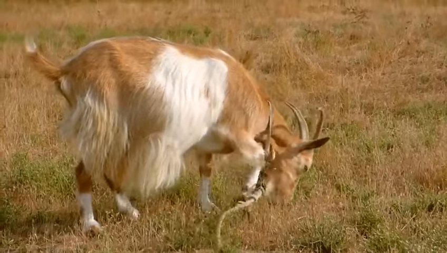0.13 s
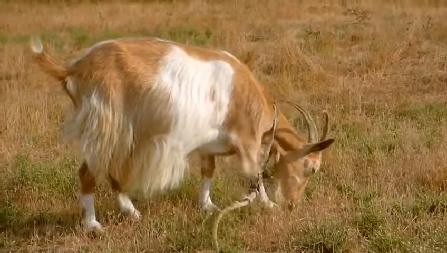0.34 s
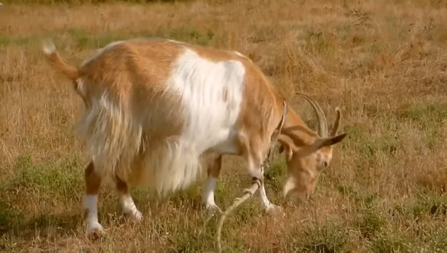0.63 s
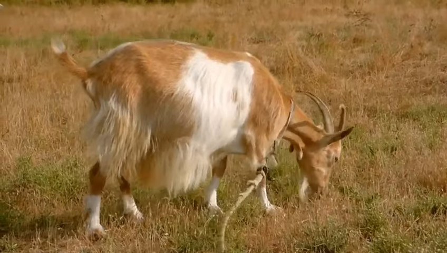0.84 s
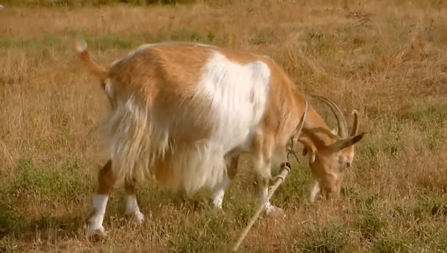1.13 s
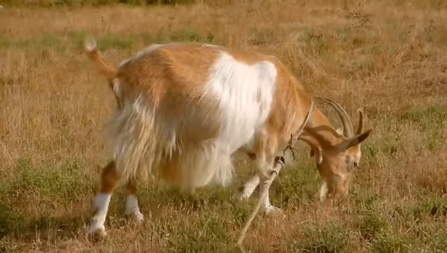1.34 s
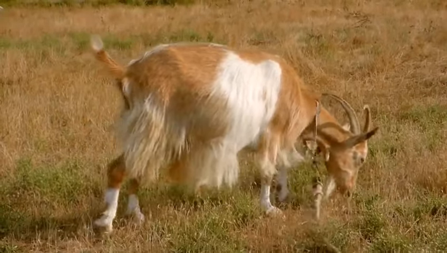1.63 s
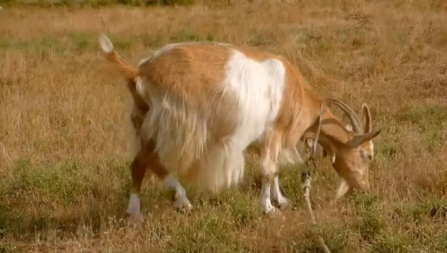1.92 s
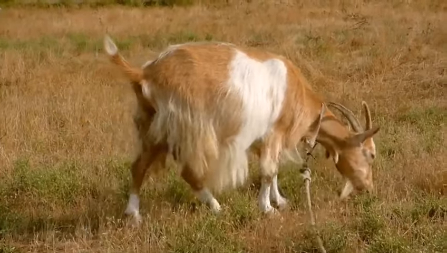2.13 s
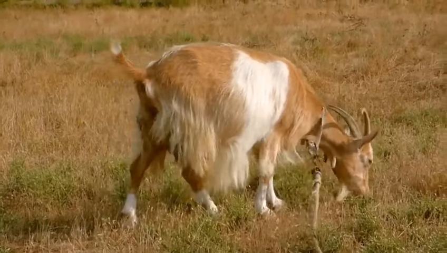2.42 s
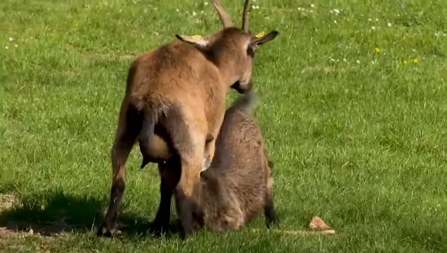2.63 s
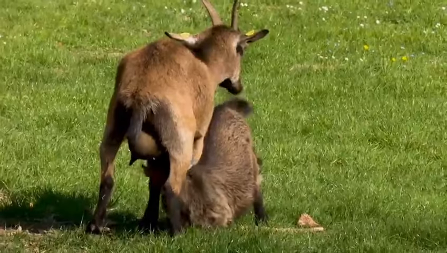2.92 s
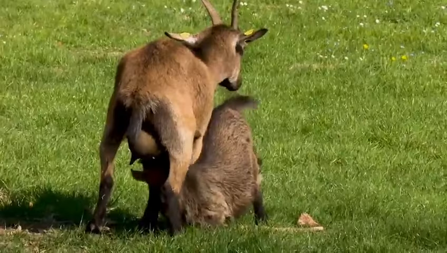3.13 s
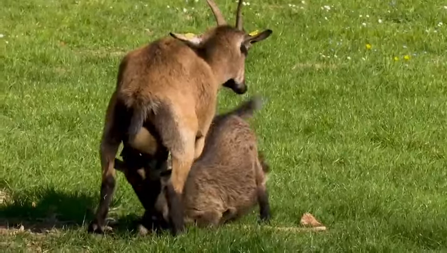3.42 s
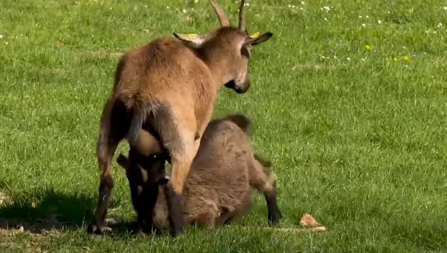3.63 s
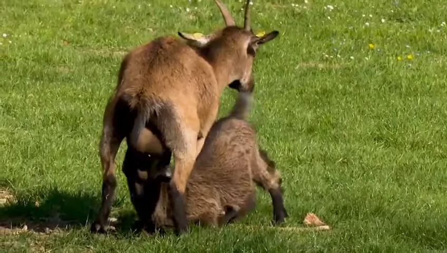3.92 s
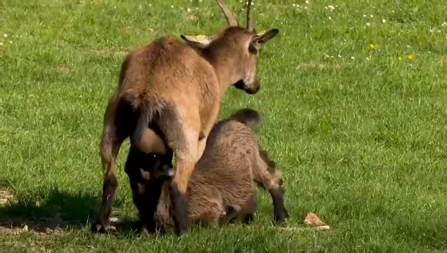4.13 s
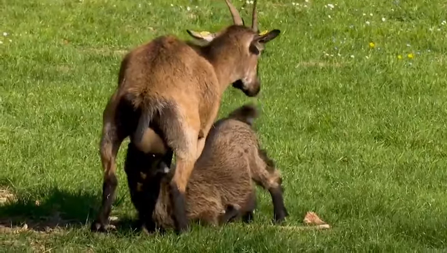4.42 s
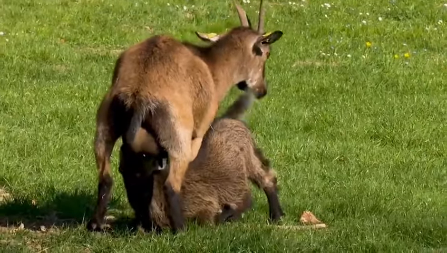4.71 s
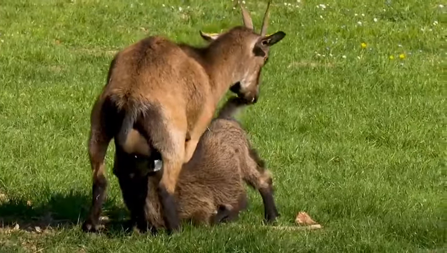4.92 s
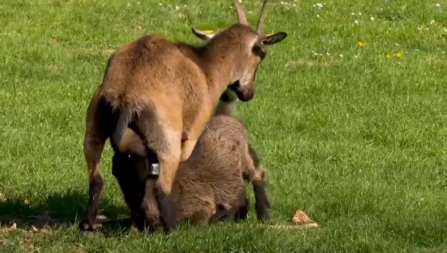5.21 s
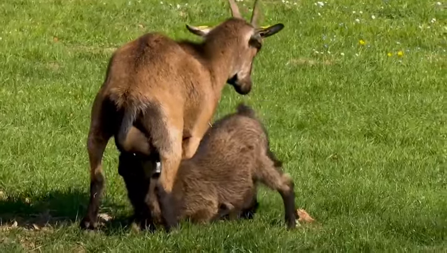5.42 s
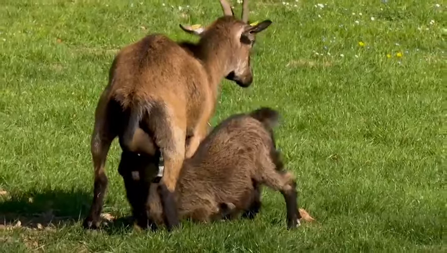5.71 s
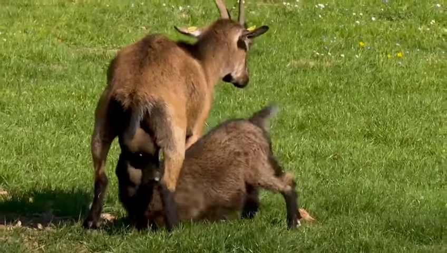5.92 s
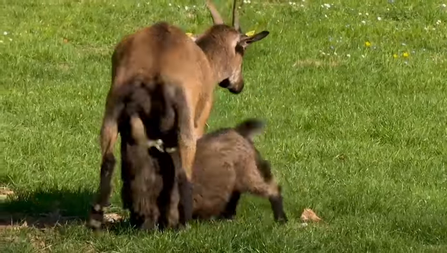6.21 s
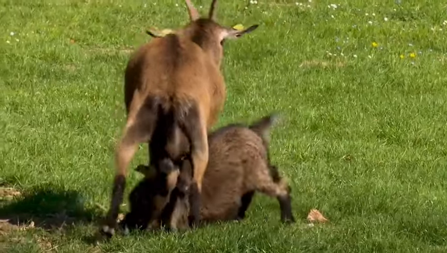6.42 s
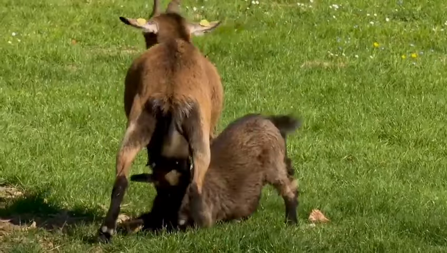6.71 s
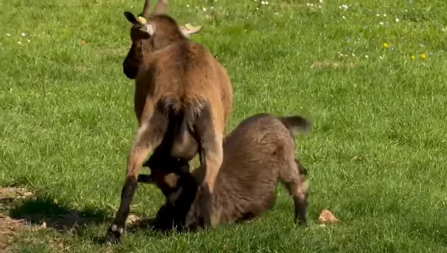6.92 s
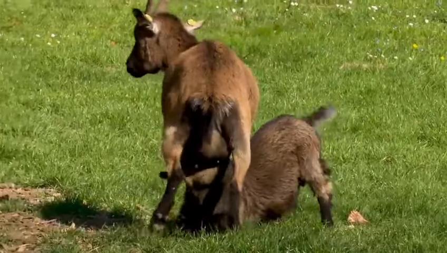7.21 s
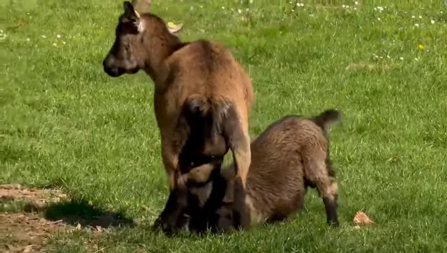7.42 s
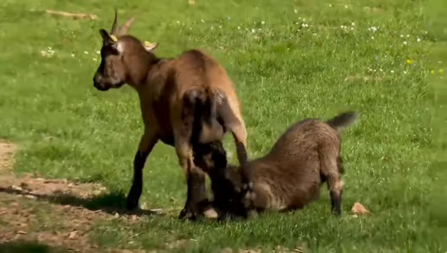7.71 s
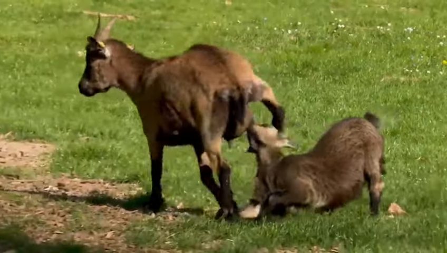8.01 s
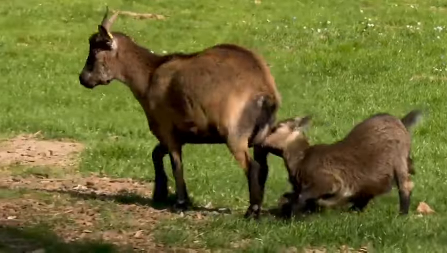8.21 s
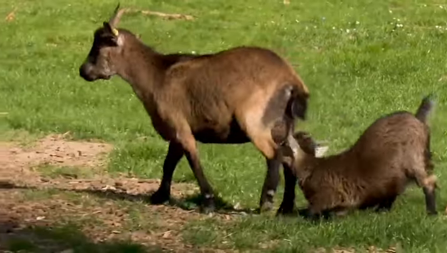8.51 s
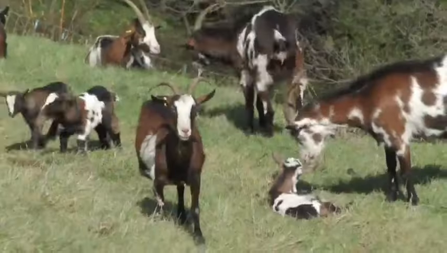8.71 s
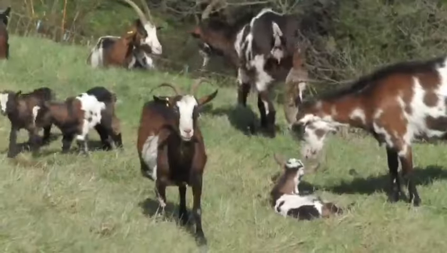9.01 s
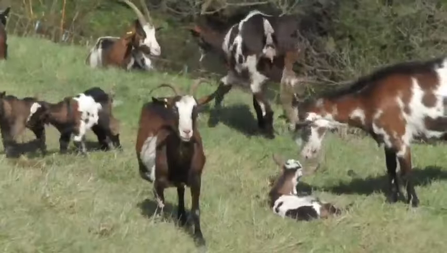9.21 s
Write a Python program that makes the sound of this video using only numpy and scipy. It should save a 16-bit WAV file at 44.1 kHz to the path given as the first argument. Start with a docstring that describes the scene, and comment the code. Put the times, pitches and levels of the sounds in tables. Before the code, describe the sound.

A fading breathy creak opens over faint hiss and low breeze. After a quiet stretch, a soft closed-mouth goat hum starts to become a call but is chopped into brief silence. A loud, quavering bleat follows, then a second after a pause, both ending in creaks. Another hum and bleat onset is cut off, and a last loud bleat runs to an abrupt end. Close, dry outdoor microphone.

```python
"""Young goat bleating on a quiet pasture

Close mono microphone. Each bleat is a sum of vocal-fold harmonics, shaped by throat resonances, throbbing about
ten times a second as the throat opens and squeezes. Full bleats end in a creak: uneven pulses mixed with breath.
A soft hum precedes the third bleat. Filtered noise makes the hiss and the low buffet of breeze.
The sound is a loop cut into pieces with short silences between: the third bleat is cut off twice as it begins."""
import sys
import numpy as np
from scipy import signal
from scipy.fft import rfft, irfft, next_fast_len
from scipy.io import wavfile
from scipy.ndimage import map_coordinates

SR = 44100
rng = np.random.default_rng(int(sys.argv[2]) if len(sys.argv) > 2 else 0)


def unload_audio(sound):
    """Save the sound as a 16-bit wav file, at the path given as the first command line argument."""
    columns = np.transpose(np.atleast_2d(sound))
    # keep every value between -1 and 1, then stretch to whole-number steps
    steps = np.round(np.clip(columns, -1, 1) * 32767)
    wavfile.write(sys.argv[1], SR, steps.astype(np.int16))


N = 412776

# Event times are loop times. Spectrum and resonance levels are relative.
# distant air and microphone hiss: hz, level_db
HISS_SPECTRUM = [(41, -27.5), (70, 1), (103, -0.5), (381, -10), (572, -10), (627, -11.5), (785, -11),
                 (899, -13.5), (1690, -17.5), (3820, -25), (11000, -17), (15500, -18)]
HISS_DB = -55
# breeze on the microphone: time_s, level_db
BUFFET_CURVE = [(2.62, -59), (3.12, -48.5), (5.35, -56.5), (5.4, -47), (5.82, -60), (5.92, -46),
                (6.03, -56), (7.97, -53), (8.12, -61), (8.15, -58), (8.53, -51), (8.6, -51.5)]
# low breeze spectrum: hz, level_db
RUMBLE_SPECTRUM = [(8.8, -46), (15, -12.5), (38, -6), (50, -6.5), (65, -29), (90, -25.5), (120, -40.5),
                   (200, -120)]

# closed-mouth hum before the third bleat, ahead of wobble: time_s, pitch_hz, level_db
GRUNT_CURVE = [(8.25, 176.2, -57), (8.285, 186.2, -53.5), (8.32, 154, -48), (8.365, 172.5, -52.5),
               (8.42, 160, -56)]
# harmonics of the hum from the fundamental up: level_db
GRUNT_HARMONICS_DB = [1, -8, -6.5, -58, -14]

# creaks and breath around bleats, fading or still growing at the end; brightness is high band against low:
# start_s, middle_s, end_s, first_db, middle_db, last_db, bright_db, bright_change_db
CREAK_EVENTS = [(3.422, 3.493, 3.53, -47, -42.5, -55, 1.5, 0),
                (3.53, 3.56, 3.63, -50, -49.5, -74, -6.5, -10),
                (5.886, 5.954, 6.095, -43, -44.5, -70, 3.5, -16),
                (8.27, 8.353, 8.424, -66, -55.5, -73, -9, 12.5),
                (8.462, 8.521, 8.518, -58.5, -39.5, -24, 3, 4),
                (8.546, 8.598, 8.623, -47, -44, -43, -5, 13.5)]
# one row a creak: mean pulse_rate_hz, breath_share (0-1)
CREAK_SOURCES = [(310, .3), (200, .4), (165, .4), (165, .5), (180, .2), (230, .3)]
# slack throat, low (response squared in use) and high: hz, width_hz, level_db
CREAK_LOW_MODES = [(630, 390, 2.5), (1545, 590, 3.5), (2830, 670, 2)]
CREAK_HIGH_MODES = [(3380, 190, 3), (4480, 1200, 0), (5170, 540, 4.5), (9700, 1600, -6)]
CREAK_UNEVEN_DB = 1.5

# throbs, one list a bleat; squeezed_db follows the throb, the three resonances are of jaw, tongue and lips:
# start_s, end_s, pitch_hz (before bends), open_db, squeezed_db, low1_hz, low2_hz, low3_hz
BLEAT_THROBS = [
    [(2.599, 2.634, 359.7, -31, -34, 870, 2047, 2700), (2.688, 2.732, 378.3, -21, -26, 1050, 1943, 2720),
     (2.779, 2.833, 372, -22.5, -26, 1080, 1954, 3200), (2.873, 2.928, 370, -22.5, -25.5, 1040, 1911, 2900),
     (2.962, 3.023, 367.7, -24, -25, 1110, 1950, 3070), (3.065, 3.114, 371, -21.5, -26.5, 1094, 1894, 2790),
     (3.155, 3.204, 364.5, -22.5, -29.5, 1070, 1940, 2780),
     (3.252, 3.304, 352.6, -23.5, -30.5, 1034, 1927, 2770),
     (3.362, 3.398, 323.5, -21.5, -39, 910, 1612, 2630)],
    [(5.036, 5.077, 285, -48.5, -62.5, 660, 1826, 2730), (5.14, 5.187, 356, -44.5, -55.5, 890, 1950, 2700),
     (5.238, 5.278, 377.6, -26.5, -30.5, 1020, 1820, 2940),
     (5.341, 5.377, 376.2, -25, -31.5, 1310, 1970, 2900),
     (5.437, 5.484, 376, -26.5, -28.5, 1280, 2130, 2986), (5.534, 5.583, 367.8, -27, -28, 1230, 2109, 3020),
     (5.635, 5.684, 358.6, -25, -28, 1240, 2140, 2920), (5.742, 5.78, 349.6, -24, -30, 1210, 2154, 2830),
     (5.84, 5.879, 305.5, -30.5, -44, 940, 2165, 2830)],
    [(8.422, 8.46, 315, -46, -47.5, 715, 1580, 2860), (8.518, 8.544, 350.7, -30.5, -34.5, 630, 1900, 2750)],
]
# four bright resonances, one list a bleat: first_throb_hz, last_throb_hz
BRIGHT_GLIDES = [
    [(3300, 3500), (4350, 4350), (4850, 4950), (5550, 5850)],
    [(3260, 3700), (4800, 4250), (4720, 4910), (5570, 5600)],
    [(3500, 3300), (4200, 4240), (4940, 5070), (5590, 5590)],
]
# open throat, three low then four bright resonances, one list a bleat: width_hz, level_db
THROAT_MODES = [
    [(117, -4), (117, 3.5), (340, -5), (120, -2), (134.6, -2.5), (184, -2.5), (132, -7.5)],
    [(490, -4.5), (208, 2.5), (124, -1.5), (451, 1.5), (530, 1.5), (120, 4), (121, -1)],
    [(125, -4.5), (191, -0.5), (120, -4.5), (120, 2.5), (120, 7.5), (120, 0), (251, -24)],
]
# small head cavities: hz, width_hz, level_db
SINUS_MODES = [(6340, 130, -29.5), (7300, 420, -24), (8910, 720, -20), (12200, 590, -50),
               (14000, 1300, -48.5)]
# side resonances of the narrowed throat: hz, width_hz, level_db
SQUEEZED_MODES = [(872, 450, -16), (1950, 117, -5), (2900, 630, -8), (4110, 1200, -2.5), (4830, 1500, -4.5)]
# ring of the squeezed throat, one row a bleat (response squared in use): first_hz, last_hz, width_hz, level_db
WHISTLE_RINGS = [(3590, 3490, 390, 0), (3480, 3640, 910, -3), (3880, 3660, 850, -1.5)]
# fundamental, one value a bleat: level_db
FUNDAMENTAL_DB = [-21, -25.5, -12.5]
# roughness, one value a bleat: relative
HOARSENESS = [.85, 1.25, 1.2]
# brightness at the reference effort, one value a bleat: level_db
BRIGHTNESS_DB = [-1.5, -3.5, -3.5]
BRIGHT_PER_DB, EFFORT_DB = 0.16, -20  # brightness follows the squeezed level around this effort
# move of each resonance as the throat shuts: share
SHUT_SHIFT_SHARE = [-.15, 0.053, .0, .03, .0, 0.015, 0.042]
PITCH_STEP_S, PITCH_RECOVER_S = .014, .014  # pitch step ahead of a throb; time constant of its climb
SQUEEZE_LIFT_SHARE = .015  # pitch rise when fully squeezed

# cuts of the loop: start_s, end_s, place_in_loop_s, fade_in_s
LOOP_PIECES = [(0, 2.499, 5.9907, 0), (2.572, 8.606, 2.572, .03), (8.721, 9.36, 2.6142, .04)]
PREAMP_PEAK, TOP_HZ = 0.36, 15550  # full scale = 1; band limit


def amp(db):
    """Gain of a level in dB."""
    return 10 ** (np.asarray(db) / 20)


def unit(x):
    """x at rms 1."""
    return x / np.sqrt(np.mean(x ** 2) + 1e-20)


def wobble(rate_hz, size):
    """Smooth random curve with rate_hz knots a second."""
    knots = rng.standard_normal(int(size * rate_hz / SR) + 4)
    return map_coordinates(knots, [np.arange(size) * rate_hz / SR])


def filtered(x, response):
    """x through a complex response of frequency."""
    m = next_fast_len(x.shape[-1] + 8192)
    return irfft(rfft(x, m) * response(np.fft.rfftfreq(m, 1 / SR)), m)[..., :x.shape[-1]]


def resonances(modes, f):
    """Causal response of parallel (hz, width_hz, level_db) modes of alternating sign."""
    return sum((-1) ** k * amp(db) * 1j * f * w / (c * c - f * f + 1j * f * w)
               for k, (c, w, db) in enumerate(modes))


def coloured(spectrum):
    """Noise of rms 1 with a (hz, level_db) spectrum."""
    hz, db = np.transpose(spectrum)

    def response(f):
        return amp(np.interp(np.log(f + 1), np.log(hz), db, -120, -120))
    return unit(filtered(rng.standard_normal(N), response))


def span(rows):
    """First sample, 4 ms end ramps and interpolated columns of a curve."""
    s, *cols = np.transpose(rows)
    t = np.arange(s[0], s[-1], 1 / SR)
    ends = np.clip(np.minimum(t - s[0], s[-1] - t) / .004, 0, 1)
    return round(s[0] * SR), ends, [np.interp(t, s, c) for c in cols]


def add(track, start, x):
    """Mix x into track from sample start."""
    track[start:start + len(x)] += x


def pasture():
    """Filtered-noise hiss, drifting slightly, over a lumpy low buffet of breeze."""
    time_s, db = np.transpose(BUFFET_CURVE)
    lumps = unit(coloured(RUMBLE_SPECTRUM) * amp(1.6 * wobble(14, N)))
    buffet = amp(np.interp(np.arange(N) / SR, time_s, db)) * lumps
    drift_db = .4 * wobble(2.3, N)
    return amp(HISS_DB + drift_db) * coloured(HISS_SPECTRUM) + buffet


def grunt(track):
    """Closed-mouth hum: a wavering harmonic tone with few overtones."""
    first, ends, (hz, db) = span(GRUNT_CURVE)
    turns = np.cumsum(hz * (1 + .03 * wobble(60, len(hz)))) / SR
    tone = sum(amp(level_db) * np.sin(2 * np.pi * (k + 1) * turns)
               for k, level_db in enumerate(GRUNT_HARMONICS_DB))
    add(track, first, ends * amp(db + 3.6 * wobble(45, len(hz))) * tone)


def creak(track, rows, pulse_rate_hz, breath_share):
    """Slow uneven pulses mixed with breath noise, through a slack throat."""
    first, ends, (db, bright_db) = span(rows)
    size = len(db)
    count = np.floor(np.cumsum(pulse_rate_hz * (1 + .15 * wobble(120, size))) / SR)
    pulses = (np.diff(count, prepend=0) > 0) * amp(2 * rng.standard_normal(size))
    breath = rng.standard_normal(size)
    air = np.sqrt(1 - breath_share) * unit(pulses) + np.sqrt(breath_share) * breath
    low = unit(filtered(air, lambda f: resonances(CREAK_LOW_MODES, f) ** 2))
    high = unit(filtered(air, lambda f: resonances(CREAK_HIGH_MODES, f) / (1 + (f / 6100) ** 10) ** 0.14))
    level = amp(db + CREAK_UNEVEN_DB * wobble(33, size))
    add(track, first, ends * level * (low + amp(bright_db) * high))


def bleat(track, rows, glides, throat, tone_db, chest_db, whistle, hoarse):
    """Vocal-fold harmonics through an open mouth in the throbs and a squeezed throat between."""
    start, end, pitch_hz, open_db, squeezed_db, *tract_hz = np.transpose(rows)
    tract_hz += [np.linspace(first, last, len(rows)) for first, last in glides]
    whistle_hz = np.linspace(*whistle[:2], len(rows))
    bright_db = tone_db + BRIGHT_PER_DB * (squeezed_db - EFFORT_DB)
    t = np.arange(start[0] - .05, end[-1] + 0.089, 1 / SR)

    def by_throb(v):
        return np.interp(t, (start + end) / 2, v)

    def knee(u):
        return np.logaddexp(0, u / 0.0029) * 0.0053

    def near(s, width_s):
        return np.exp(-((t - s[:, None]) / width_s) ** 2).sum(0)

    # slow swell, quick close; a throb after near silence bursts out
    early, late = knee(start[:, None] + 0.0046 - t), knee(t - end[:, None] + 0.0025)
    swell = 437 + 20 * (open_db - np.r_[squeezed_db[0], squeezed_db[:-1]])  # slope, scaled further by knee
    opening = amp(open_db[:, None] - swell[:, None] * early - 1360 * late).sum(0)
    gaps = np.c_[end, np.r_[start[1:], end[-1] + .025]].ravel()
    gap_db = np.r_[squeezed_db[0] - 20, np.repeat(squeezed_db, 2), squeezed_db[-1] - 15]
    squeeze = amp(np.interp(t, np.r_[start[0], gaps, t[-1]], gap_db))
    closed = squeeze / (squeeze + opening)

    # slack folds sound lower as each throb starts and ends
    since = t - (start[:, None] - PITCH_STEP_S)
    climb = np.exp(-np.maximum(since, 0) / PITCH_RECOVER_S)
    scoop = (climb * np.exp(-(np.minimum(since, 0) / .004) ** 2)).sum(0)
    sag = 0.12 * scoop + 0.043 * near(end, .008)
    sag += .05 * np.clip((t - start[-1]) / .06, 0, 1)  # breath runs out
    jitter = hoarse * (.002 + .001 * closed) * wobble(120, len(t))
    steps = np.c_[start - PITCH_STEP_S, np.r_[start[1:], t[-1]] - PITCH_STEP_S - .006].ravel()
    base_hz = np.interp(t, steps, np.repeat(pitch_hz, 2))
    f0 = base_hz * (1 - sag + SQUEEZE_LIFT_SHARE * closed + jitter)
    turns = np.cumsum(f0) / SR

    # tract gain of each harmonic, every 32 samples
    order = np.arange(1, 46)[:, None]
    grid = slice(None, None, 32)
    f = order * f0[grid]
    modes = [((by_throb(hz) * (1 + shift * closed))[grid], w, db)
             for hz, shift, (w, db) in zip(tract_hz, SHUT_SHIFT_SHARE, throat)]
    cliff = 1 / (1 + (f / 5900) ** 14) ** .5  # the mouth passes little above its last resonance
    low = resonances(modes[:3], f) * (order > 1) + amp(chest_db) * (order == 1)
    bright = amp(by_throb(bright_db)[grid])
    wide = (low + bright * resonances(modes[3:], f)) * cliff  # low and bright cancel in a notch between
    wide = wide / np.sqrt(np.sum(abs(wide[:7]) ** 2, 0) / 2)  # level set by the first seven harmonics
    sinus = resonances(SINUS_MODES, f)
    wide = wide + bright * sinus
    shut = (squeeze * closed)[grid]
    ring_mode = (np.interp(t[grid], end + 0.023, whistle_hz), *whistle[2:])
    clear = wide * opening[grid] + resonances([ring_mode], f) ** 2 * shut
    rasp = (resonances(SQUEEZED_MODES, f) * cliff + amp(-6.0) * sinus) * shut

    # turbulence smears each harmonic, most as the throat opens and shuts
    edges = near(start, 0.011) + near(end, 0.016)
    voice = np.zeros(len(t))
    for k, steady, ragged in zip(order[:, 0], clear, rasp):
        stir = wobble(260, len(t)) + 1j * wobble(260, len(t))
        blur = hoarse * (.035 + .005 * k + .0003 * k * k) * (1 + 1.3 * edges)
        gain = np.interp(t, t[grid], steady) * (1 + blur * stir)
        gain = gain + np.interp(t, t[grid], ragged) * (.45 + .65 * stir)
        voice -= np.real(gain * np.exp(2j * np.pi * k * turns))
    shimmer = amp((.5 + 1.5 * closed) * wobble(60, len(t)))  # breath pressure flutters
    add(track, round(t[0] * SR), voice * shimmer)


def goat():
    """All the calls, plus a faint decaying noise scatter off the ground and fence."""
    track = np.zeros(N)
    for call in zip(BLEAT_THROBS, BRIGHT_GLIDES, THROAT_MODES, BRIGHTNESS_DB,
                    FUNDAMENTAL_DB, WHISTLE_RINGS, HOARSENESS):
        bleat(track, *call)
    for event, source in zip(CREAK_EVENTS, CREAK_SOURCES):
        start, middle, end, first_db, middle_db, last_db, bright_db, change_db = event
        rows = [(start, first_db, bright_db),
                (middle, middle_db, bright_db + change_db / 2),
                (end, last_db, bright_db + change_db)]
        creak(track, rows, *source)
    grunt(track)
    t = np.arange(SR // 5) / SR
    scatter = rng.standard_normal(len(t)) * amp(-60 * t / .15)  # 60 dB down in 0.15 s
    return track + amp(-21) * signal.fftconvolve(track, scatter / np.linalg.norm(scatter))[:N]


def scene():
    """Pieces of the loop, cut off hard, some faded in; two identical channels."""
    loop, out = goat() + pasture(), np.zeros(N)
    for start, end, place, fade in LOOP_PIECES:
        size = min(round(end * SR), N) - round(start * SR)
        ramp = np.clip(np.arange(1, size + 1) / (fade * SR + 1), 0, 1) ** 2
        add(out, round(start * SR), ramp * loop[round(place * SR):][:size])
    return np.array([out, out])


def record(dry):
    """The preamplifier rounds off loud peaks; nothing is kept above the band limit."""
    soft = dry / (1 + abs(dry / PREAMP_PEAK) ** 4) ** (1 / 4)
    return filtered(soft, lambda f: f < TOP_HZ)


dry = scene()
out = record(dry)
unload_audio(out)
```